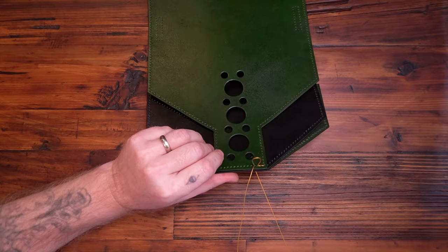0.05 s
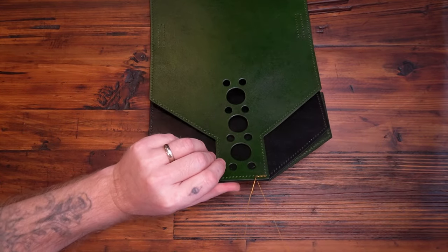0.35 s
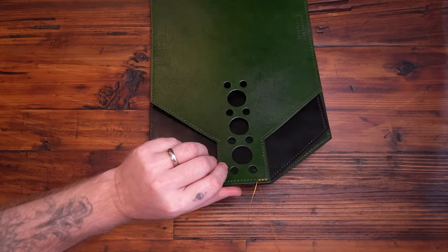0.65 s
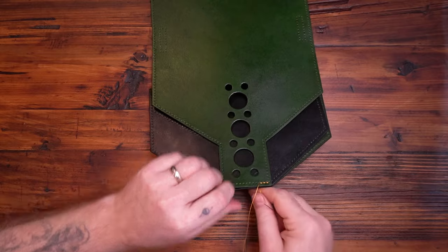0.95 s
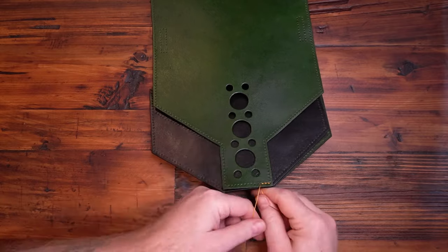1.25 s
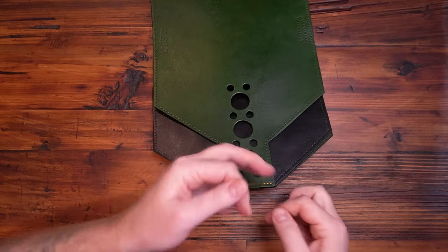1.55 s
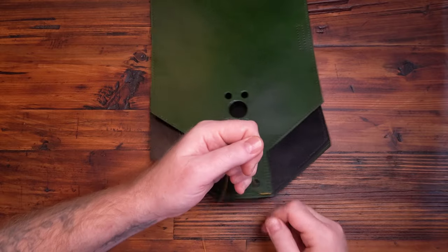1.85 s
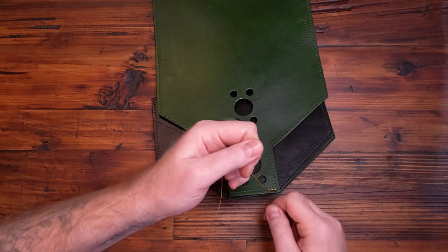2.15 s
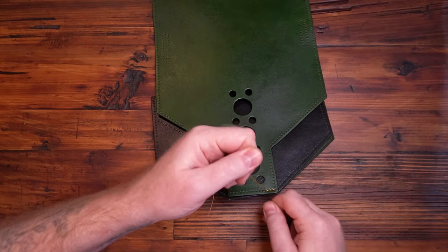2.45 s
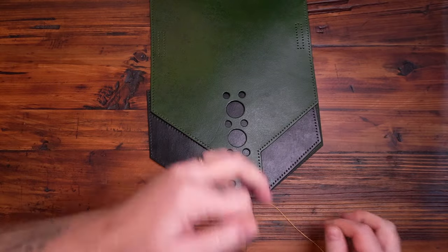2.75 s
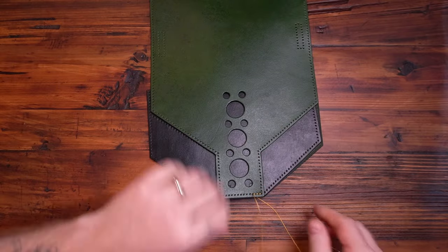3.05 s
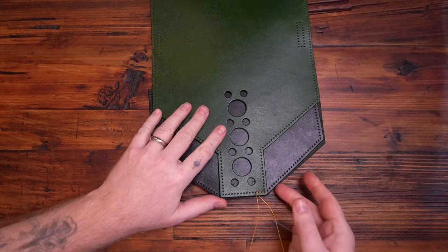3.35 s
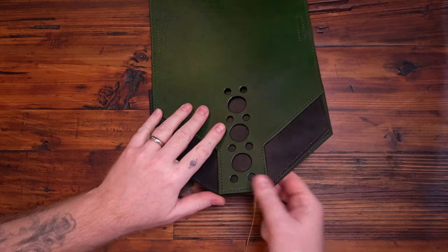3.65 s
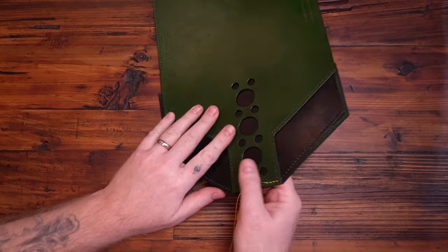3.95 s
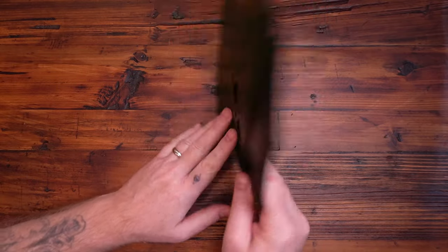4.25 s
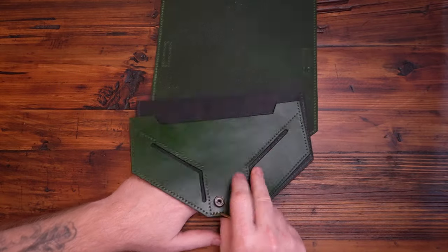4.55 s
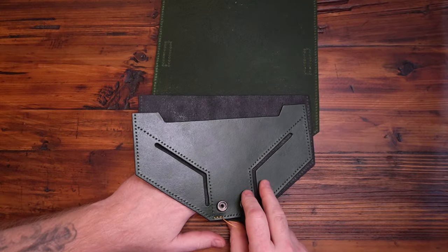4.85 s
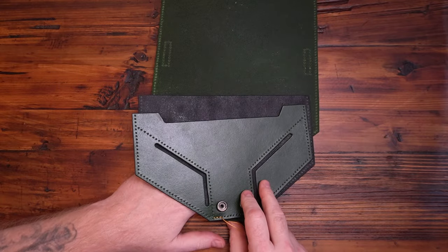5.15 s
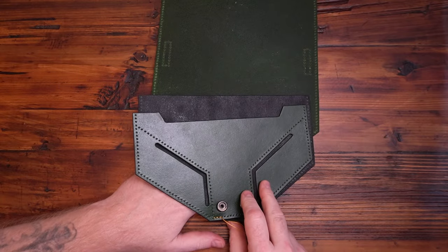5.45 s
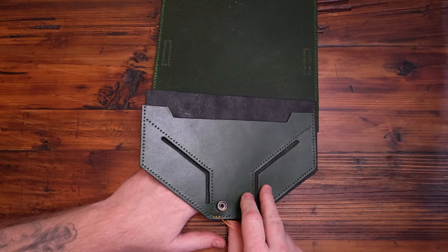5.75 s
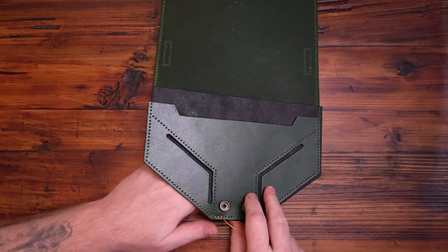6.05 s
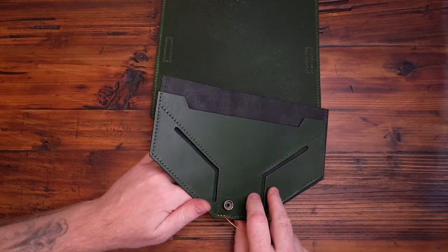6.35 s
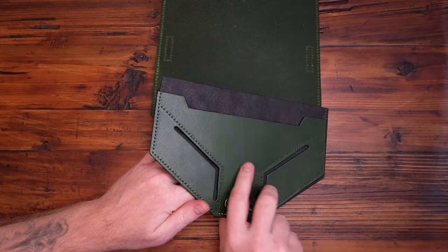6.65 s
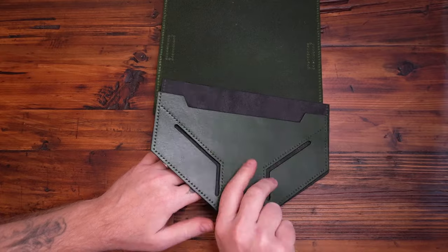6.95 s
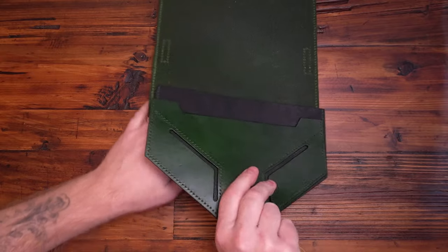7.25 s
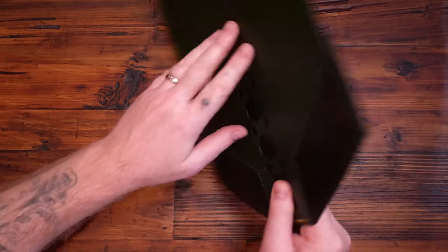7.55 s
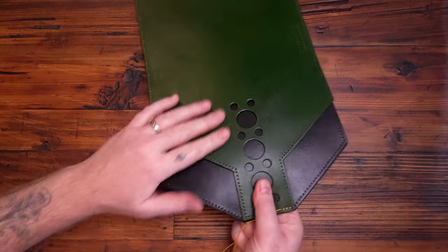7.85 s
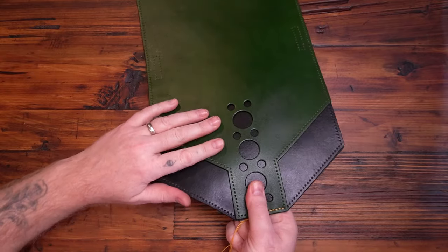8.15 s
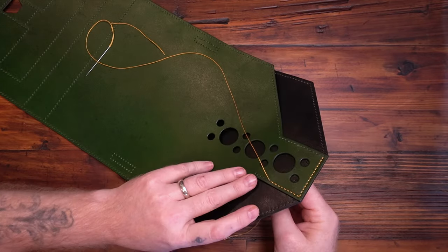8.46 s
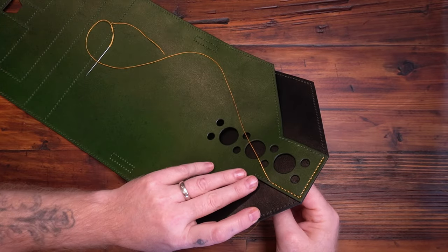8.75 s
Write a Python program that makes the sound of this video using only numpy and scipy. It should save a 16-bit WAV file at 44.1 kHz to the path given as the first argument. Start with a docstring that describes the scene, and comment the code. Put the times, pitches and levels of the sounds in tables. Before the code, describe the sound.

Short scratchy thread pulls and light ticks, followed by leather scraping, turning over and landing twice with soft thumps on wood.

```python
"""Leather panel on a wooden table

Close up in a small quiet room, waxed thread rasps and snaps as a stitch is drawn tight; then the stiff
panel is dragged, turned over twice and dropped flat. Each contact is a short crush of tiny impacts that
also knocks the table. Each stroke is a stream of fine grains that swells and dies away with the hand,
coloured by the panel and the air pocket under it."""
import sys
import numpy as np
from scipy import signal
from scipy.fft import rfft, irfft, next_fast_len
from scipy.io import wavfile
from scipy.ndimage import uniform_filter1d

SR = 44100
rng = np.random.default_rng(int(sys.argv[2]) if len(sys.argv) > 2 else 0)


def file_out(sig):
    """Save sig as 16-bit WAV at sys.argv[1]."""
    # one column per channel
    cols = np.atleast_2d(sig).T
    # limit, then scale
    lim = np.clip(cols, -1, 1)
    pcm = np.round(lim * 32767).astype(np.int16)
    wavfile.write(sys.argv[1], SR, pcm)


N = 388080

# taps, thread snaps and slaps of the panel: (time [s], relative energy [dB], tone [Hz],
# slope above the tone [dB/octave], relative table thump energy [dB], length before stretching [ms])
CONTACTS = [(0.2544, -25.5, 1250, -10, -31, 2.9), (0.3317, -9, 950, -4, -40, 0.82),
            (0.4564, -22.5, 900, -8, -38, 0.82), (1.437, -18.5, 960, -12, -36, 7.6),
            (1.456, -23, 1440, -0.5, -38, 2), (1.746, -19, 1540, -5, -41, 1.3),
            (1.755, -16, 1500, -3, -32, 4.5), (1.779, -18, 2020, -6, -32, 1.8),
            (2.663, -27.5, 1800, -12, -39, 1.8), (2.6958, -4.5, 2360, -15, -18.5, 1.6),
            (2.698, -1.5, 2440, -7, -16, 3), (3.344, -30, 1120, -7.5, -49, 2.7),
            (3.74, -23, 1110, -7, -45, 2.4), (3.759, -25, 980, -9.5, -41, 0.98),
            (4.248, -10, 1000, -7, -30, 1.3), (4.475, -24.5, 450, -8, -34, 3.3),
            (4.584, -10.5, 450, -6.5, -21, 6.8), (4.593, -4.5, 910, -7, -28, 2.9),
            (4.612, 3.5, 1020, -6.8, -8.5, 3), (4.6255, 6, 580, -4, -3.5, 3.7),
            (4.6363, 1.5, 670, -4, -16, 1.8), (4.642, -2.5, 450, -1, -4.5, 2.6),
            (4.713, 0.5, 930, 0, -32, 2.9), (4.74, -5, 920, 0, -45, 0.91), (4.7502, -6, 470, 2, -11, 1.4),
            (4.7558, -4.5, 740, -5.5, -18.5, 7.5), (4.887, -1.5, 2900, 1, -23, 0.76),
            (4.968, -20, 1470, -1.5, -43, 6.4), (4.986, -27.5, 600, -4, -45, 1.7),
            (5.079, -31, 890, -0.5, -39, 0.68), (5.162, -33, 900, 1, -52, 1),
            (6.84, -24.5, 2370, -0.5, -41, 1.7), (7.024, -26.5, 950, -12, -39, 2.7),
            (7.076, -12.5, 870, -12.5, -28, 4.1), (7.2903, -16, 1000, -8.5, -29, 1.6),
            (7.388, -15, 450, -3, -20, 0.86), (7.456, -15.5, 720, -4.5, -20, 1.8),
            (7.487, -13, 1190, -1.5, -36, 1.4), (7.5, -13, 1820, -4, -46, 2),
            (7.514, -9, 600, -0.5, -21, 3), (7.667, -23, 520, -13, -43, 3.3),
            (7.894, 6, 460, -4, -29, 1.36), (7.8996, 3.5, 650, -6, 1.5, 2.1),
            (7.9174, 0, 450, -5.5, -18, 1.5), (7.982, -11, 450, -4.5, -41, 0.96),
            (8.096, -21, 1090, -6, -29, 2.2)]
# dull spectrum of the table when knocked or pushed: (frequency [Hz], relative level [dB])
TABLE_RUMBLE = [(25, -20), (60, -15), (125, -7), (175, -23), (210, -2.5), (260, -9), (330, -2), (410, -13),
                (700, -13), (1500, -53)]


def undb(db):
    """Decibels to gain."""
    return 10 ** (np.asarray(db) / 20)


def unit(x):
    """Scale to an energy of one."""
    return x / np.sqrt(np.sum(x ** 2))


def level(x, db):
    """Scale to an rms level."""
    return x * undb(db) / np.sqrt(np.mean(x ** 2))


def at_hz(hz, points):
    """Read (frequency, value) points on a log-frequency axis."""
    f, value = np.transpose(points)
    return np.interp(np.log(hz + 1), np.log(f), value)


def colour(x, points):
    """Equalise by (frequency [Hz], gain [dB]) points and scale to an rms of one."""
    gain = undb(at_hz(np.fft.rfftfreq(len(x), 1 / SR), points))
    return level(np.fft.irfft(rfft(x) * gain, len(x)), 0)


def resonate(x, hz, q):
    """A resonance with a gain of one at its centre."""
    return signal.lfilter(*signal.iirpeak(hz, q, fs=SR), x + 1e-18)


def walk(per_s):
    """A random drift with a spread near one."""
    knots = rng.standard_normal(N // 40)
    return 1.2 * np.interp(np.arange(N) / SR * per_s, np.arange(len(knots)), knots)


def add(track, s, sound):
    """Mix a sound in at a time."""
    i = int(s * SR)
    track[i:i + len(sound)] += sound[:N - i]


def swell(peak_s, rise_s, fall_s, depth_db=19, roundness=0.92):
    """Envelope of one hand movement: it gains depth_db over its rise and loses it over its fall."""
    near = np.arange(max(0, int((peak_s - 3 * rise_s) * SR)), min(N, int((peak_s + 3 * fall_s) * SR)))
    t, gain = near / SR - peak_s, np.zeros(N)
    gain[near] = undb(-depth_db * np.maximum(-t / rise_s, t / fall_s) ** roundness)
    return gain


def room_tone(air_db=-63.5, waver_db=1.5, side_db=-68):
    """Still air and a faint fan; the bass is alike in both ears, the hiss less so."""
    # spectrum of the quiet air: (frequency [Hz], relative level [dB])
    air_spectrum = [(12, -40), (20, -7), (127, -6.5), (163, -9.5), (204, -4), (241, -10), (399, -14.5),
                    (459, -14), (660, -13.5), (1030, -20), (1440, -20.5), (2140, -25.5), (2320, -25),
                    (14700, -33.5), (16000, -36)]
    # broad drones of a distant fan: (frequency [Hz], half width [Hz], level [dB])
    fan_drones = [(215, 14, -74), (652, 36, -74)]
    side_spectrum = [(30, -19.5), (200, -9.5), (700, -10), (2000, -18), (6000, -24.5), (16000, -34)]
    mid = colour(rng.standard_normal(N), air_spectrum) * undb(air_db - waver_db * walk(3.06))
    side = colour(rng.standard_normal(N), side_spectrum)
    f = np.fft.rfftfreq(N, 1 / SR)
    for hz, width_hz, db in fan_drones:
        drone = irfft(rfft(rng.standard_normal(N)) / (1 + ((f - hz) / width_hz) ** 2))
        mid += level(drone, db)
    return mid + undb(side_db) * side * np.array([[1], [-1]])


def reflections(x, eq, decay_scale, delay_s, size=26000):
    """A diffuse echo of x whose octave bands die at their own pace; eq is (frequency [Hz], gain [dB])."""
    # decay of the room: (frequency [Hz], t60 before decay_scale [s])
    room_decay = [(100, 0.83), (350, 0.39), (1000, 0.44), (2500, 0.34), (6000, 0.33), (14000, 0.18)]
    t, f = np.arange(size) / SR, np.fft.rfftfreq(size, 1 / SR)
    noise, tail = rfft(rng.standard_normal(size)), 0
    for hz in 62.5 * 2 ** np.arange(9):
        band = irfft(noise * np.maximum(1 - np.abs(np.log2((f + 1) / hz)), 0))
        t60 = decay_scale * at_hz(hz, room_decay)
        tail = tail + band * np.exp(-np.log(1000) * t / t60)
    echo = unit(tail * np.clip(t / delay_s - .5, 0, 1))
    padded = next_fast_len(N + size)
    gain = undb(at_hz(np.fft.rfftfreq(padded, 1 / SR), eq))
    return irfft(rfft(x, padded) * rfft(echo, padded) * gain, padded)[:N]


def pushing(trim_db=-2):
    """Dragging weight makes the table rumble."""
    # hands and flexing panel bearing down: (hardest at [s], rise [s], fall [s], relative level [dB])
    pushes = [(3.26, 0.037, 0.62, -60), (3.78, .3, .3, -73), (4.29, 0.21, 0.27, -51.5),
              (4.63, .04, .17, -47), (4.85, 0.193, .2, -56), (7.5, .3, 0.29, -61), (7.65, 0.12, 0.12, -53),
              (7.91, 0.054, 0.2, -44)]
    power = sum((undb(db + trim_db) * swell(*timing)) ** 2 for *timing, db in pushes)
    return np.sqrt(power) * colour(rng.standard_normal(N), TABLE_RUMBLE)


def judders(q=14, size=16384):
    """Skin sticks and slips on the wood in short, narrow, low groans."""
    # a palm juddering over the table: (centre time [s], half length [s], pitch [Hz], level [dB])
    groans = [(2.972, 0.11, 210, -65.5), (3.281, 0.058, 489, -61), (3.541, 0.045, 198, -62.5),
              (3.635, 0.052, 197, -58.5), (3.768, .025, 65, -62), (7.665, 0.026, 71.4, -59.5)]
    out, t = np.zeros(N), (np.arange(size) - size / 2) / SR
    for s, half_s, hz, db in groans:
        groan = resonate(rng.standard_normal(size), hz, q)
        add(out, s + t[0], level(groan, db) * np.exp(-(t / half_s) ** 2))
    return out


def whumps(hz=122, q=1.6, decay_s=0.047, rise_s=.006, size=16384):
    """The falling panel squeezes out the air beneath it in a soft low whump."""
    # the panel falling flat: (time [s], level before the envelope [dB])
    landings = [(4.625, -43), (7.9, -39)]
    out, t = np.zeros(N), np.arange(size) / SR
    for s, db in landings:
        air = resonate(resonate(rng.standard_normal(size), hz, q), hz, q)
        add(out, s, level(air, db) * (1 - np.exp(-t / rise_s)) * np.exp(-t / decay_s))
    return out


def thump(knock_db=-3, rise_s=0.00274, decay_s=0.0093, ring_db=1, uneven_db=2, size=12000):
    """The table answers with a dull knock and its low modes, in a new mix at each spot."""
    # modes of the table top: (frequency [Hz], relative level [dB], t60 [s])
    table_modes = [(100.4, -3.5, 0.2), (130.6, 0, 0.37), (153.2, -6, 0.56), (244, -18, 0.54),
                   (324, 5.5, 0.24), (435.3, -2, 0.21), (529, -1, 0.26), (683.6, -6.5, 0.18),
                   (767, -4.5, 0.33)]
    t = np.arange(size) / SR
    hz, db, t60 = np.transpose(table_modes)[:, :, None]
    share, detune, polarity = rng.standard_normal((3, len(table_modes), 1), dtype=np.float32)
    modes = np.sin(2 * np.pi * hz * (1 + 0.0053 * detune) * t) * np.exp(-np.log(1000) * t / t60)
    ring = np.sum(np.sign(polarity) * undb(db + uneven_db * share) * modes, axis=0)
    envelope = (1 - np.exp(-t / rise_s)) * np.exp(-t / decay_s)
    knock = colour(rng.standard_normal(size), TABLE_RUMBLE) * envelope
    return undb(knock_db) * unit(knock) + undb(ring_db) * unit(ring)


def knocks(trim_db=-1):
    """Each contact also shakes the table."""
    out = np.zeros(N)
    for s, _, _, _, thump_db, _ in CONTACTS:
        add(out, s, undb(thump_db + trim_db) * thump())
    return out


def air_pocket(x, q=6.1, through_db=-0.58, count=9):
    """Air trapped under the panel adds a hollow note that glides as the panel bends."""
    # note of the pocket: (time [s], pitch [Hz])
    pocket_glide = [(.3, 1090), (3.75, 1000), (3.9, 850), (4.1, 790), (4.2, 610), (4.4, 680), (4.63, 770),
                    (4.8, 880), (5.0, 780), (6.2, 1020), (7.29, 856), (7.42, 760), (7.65, 600), (7.9, 740),
                    (8.25, 860)]
    hz = np.interp(np.arange(N) / SR, *np.transpose(pocket_glide))
    centres = np.geomspace(hz.min(), hz.max(), count)
    out = undb(through_db) * x
    for centre, share in zip(centres, np.eye(count)):
        crossfade = np.interp(hz, centres, share)
        out += crossfade * resonate(x, centre, q)
    return out


def panel(x, through_db=-1):
    """The stiff panel lends its resonances to whatever rubs or strikes it."""
    # resonances of the panel and the taut thread in it: (frequency [Hz], Q, gain [dB])
    resonances = [(669, 22, -12), (978, 16, -10.5), (1710, 61, -17), (1983, 29, -6.5), (2260, 9.8, -8),
                  (2860, 23, -16.5), (5600, 12, -10), (6600, 35, -12.5), (13400, 16, -18)]
    return undb(through_db) * x + sum(undb(db) * resonate(x, hz, q) for hz, q, db in resonances)


def crush(tone_hz, slope, ms, q=1, rise=0.13, size=2048):
    """One contact: a brief burst of micro-impacts rings a heavily damped patch of leather."""
    age = np.arange(size) / SR * 1000 / max(ms, .3)  # in burst lengths
    burst = rfft(rng.standard_normal(size) * (1 - np.exp(-age / rise)) * np.exp(-age ** 1.05))
    burst /= np.sqrt(uniform_filter1d(np.abs(burst) ** 2, size=36))  # flatten, so the patch sets the tone
    s = 1j * np.fft.rfftfreq(size, 1 / SR) / tone_hz
    # a small patch radiates no bass; a soft contact loses treble
    patch = s * s / (s * s + s / q + 1) * (1 + s) ** (slope / 6)
    return unit(irfft(burst * patch)[:size // 2])


def crackle(tone_hz=4800, slope=-4, scatter_db=3, ms=1, count=24):
    """Bent leather lets go in small dry clicks at uneven gaps."""
    # runs of clicks: (start [s], end [s], rate [1/s], energy at start [dB], energy at end [dB])
    flexes = [(4.412, 4.441, 89, -28, -28), (4.614, 4.831, 75, -13.5, -15), (4.835, 4.93, 123, -19.5, -32),
              (7.439, 7.633, 66, -22.5, -32.5)]
    out = np.zeros(N)
    for start, end, per_s, first_db, last_db in flexes:
        places = (np.arange(count) + rng.random(count)) / (per_s * (end - start))
        for place, (force, pitch) in zip(places, rng.standard_normal((count, 2))):
            click = crush(tone_hz * 1.3 ** pitch, slope, ms)
            if place < 1:
                db = first_db + place * (last_db - first_db) + scatter_db * force
                add(out, start + place * (end - start), undb(db) * click)
    return out


def twang(at_s=2.698, size=4096):
    """The waxed thread rings for an instant as the stitch snaps tight."""
    # partials of the taut thread: (frequency [Hz], energy [dB], t60 [s])
    thread_partials = [(2600, -11, 0.019), (2850, -10.5, 0.027), (4150, -17, 0.036), (6650, -13, .008)]
    out, t = np.zeros(N), np.arange(size) / SR
    for hz, db, t60 in thread_partials:
        partial = np.sin(2 * np.pi * hz * t) * np.exp(-np.log(1000) * t / t60)
        add(out, at_s, undb(db) * unit(partial))
    return out


def wandering(x, low_hz=1400, high_hz=14000, q=16, ring_db=-4, wander_db=5, per_s=14, count=18):
    """As the point of contact moves, overlapping resonances come and go in the scrape."""
    centres = np.geomspace(low_hz, high_hz, count)
    return x + sum(undb(ring_db + wander_db * walk(per_s)) * resonate(x, hz, q) for hz in centres)


def sliding(grains_per_s=6000, spread_db=2, smooth_db=-1, catch_db=2, rasp_db=-1, sheet_db=-4, hiss_db=-2):
    """Fibres catch and let go in uneven grains, heard as edge rasp, hollow sheet and fine hiss."""
    # strokes of thread and leather: (fastest at [s], rise [s], fall [s], relative level [dB],
    # sheet offset [dB], hiss offset [dB])
    strokes = [(0.326, 0.065, 0.08, -46, 5, -9.5), (0.465, 0.052, 0.11, -63, 5, -3.5),
               (1.07, 0.56, 0.37, -62.5, -17, -4.5), (1.44, 0.082, .09, -55.5, -8, -6.5),
               (1.76, 0.024, 0.082, -45.5, -2.5, -7), (1.94, 0.31, .11, -51, -2.5, -9),
               (2.09, 0.29, 0.16, -60, -2.5, -14), (2.63, .05, 0.083, -57, -17, -3),
               (2.695, 0.037, 0.098, -50.5, -1, 0), (3.31, 0.11, 0.13, -60.5, -3, -2),
               (3.48, 0.097, 0.13, -62, 0.5, -2), (3.72, 0.1, 0.21, -58.5, -0.5, 5),
               (3.92, 0.16, 0.32, -59.5, 4.5, 0.5), (4.25, 0.17, 0.14, -41, -2, -8),
               (4.302, 0.13, 0.019, -40.5, -11, 3.5), (4.355, 0.023, 0.095, -50, 4, -4),
               (4.54, 0.085, .08, -59.5, -1, 2.5), (4.628, 0.029, 0.098, -29.5, -2.5, -14),
               (4.765, 0.058, 0.07, -33.5, -22, -6), (4.905, 0.21, 0.03, -51.5, 0, -12),
               (4.99, .03, 0.014, -58, 7.5, 1), (5.87, 0.26, 0.17, -66.5, 0, -13),
               (6.2, 0.22, 0.2, -61.5, -2.5, -7), (6.76, 0.31, 0.14, -61.5, -4, -1),
               (7.04, 0.3, 0.22, -62, 2, -6), (7.25, 0.21, 0.25, -63, 5.5, 4.5),
               (7.31, 0.066, 0.28, -54, 8, -9), (7.405, 0.098, 0.037, -47.5, 8.5, -5.5),
               (7.522, 0.15, 0.045, -41.5, -5.5, -2.5), (7.63, 0.045, 0.11, -59.5, 1, -2),
               (7.819, 0.4, 0.42, -67, 8, 12.5), (7.91, 0.011, 0.057, -28.5, 2.5, -17),
               (7.974, .06, 0.085, -37, 0.5, -14), (8.123, 0.059, 0.018, -50.5, 8, -8),
               (8.248, 0.1, 0.094, -56, 8, -10)]
    # spectra of the rasping edge, hollow sheet and fine grain: (frequency [Hz], relative level [dB])
    rasp_spectrum = [(600, -31), (1100, 1), (1500, 0.5), (2200, 3), (3000, 0.5), (4200, -3.5), (6200, -13),
                     (8000, -18.5), (14000, -34)]
    sheet_spectrum = [(200, -42), (400, -2.5), (600, 3.5), (800, 3.5), (1020, -1.5), (1300, -5),
                      (2000, -19), (4000, -43)]
    hiss_spectrum = [(3000, -13), (6000, -3), (7800, -0.5), (10000, 0), (13500, -2.5), (16000, -6.5)]
    power = np.zeros((3, N))
    for *timing, db, hollow_db, fine_db in strokes:
        power += np.outer(undb([db, db + hollow_db, db + fine_db]), swell(*timing)) ** 2
    rasp_swell, sheet_swell, hiss_swell = np.sqrt(power)
    sizes = undb(spread_db * np.minimum(rng.exponential(size=N), 5))
    grains = (rng.random(N) < grains_per_s / SR) * sizes * rng.choice([-1, 1], N)
    texture = level(grains, 0) + undb(smooth_db) * rng.standard_normal(N)
    friction = wandering(texture * undb(catch_db * walk(110)))
    rasp = undb(rasp_db) * rasp_swell * colour(friction, rasp_spectrum)
    sheet = undb(sheet_db) * sheet_swell * colour(friction[::-1], sheet_spectrum)  # reversed: own grain
    hiss = undb(hiss_db) * hiss_swell * colour(friction, hiss_spectrum)
    return rasp + sheet + hiss


def contacts(stretch, trim_db=-1.22):
    """All taps, thread snaps and slaps of the panel; stretch scales their length."""
    out = np.zeros(N)
    for s, db, tone_hz, slope, _, ms in CONTACTS:
        add(out, s, undb(db + trim_db) * crush(tone_hz, slope, ms * stretch))
    return out


def scene():
    """Direct sound in the middle, the walls around it, and treble that scatters to the sides."""
    # colour of each echo: (frequency [Hz], gain [dB])
    walls_eq = [(100, -11.5), (600, -10.5), (2500, -11.5), (7000, -11.5), (15000, -6.5)]
    side_eq = [(100, -42.5), (500, -23.5), (1200, -16), (3000, -16), (15000, -12)]
    bounce_eq = [(100, -36), (500, -24.5), (1000, -28), (3000, -10), (8000, -8), (15000, -2)]
    handling = sliding() + crackle() + twang()
    low_end = knocks() + pushing() + judders() + whumps()
    direct = air_pocket(panel(contacts(stretch=1) + handling)) + low_end
    # summed over all directions a contact has the smooth spectrum of one click
    radiated = air_pocket(panel(contacts(stretch=.1) + handling)) + low_end
    walls = reflections(radiated, walls_eq, decay_scale=0.82, delay_s=0.0045)
    walls_side = reflections(radiated, side_eq, decay_scale=1, delay_s=0.0038)
    # sideways each contact radiates other micro-impacts, which bounce off the table
    sideways = contacts(stretch=0.56) + handling
    bounces = reflections(sideways, bounce_eq, decay_scale=0.031, delay_s=0.00027, size=2048)
    return direct + walls + (walls_side + bounces) * np.array([[1], [-1]]) + room_tone()


def record(dry, low_hz=24, top_hz=16100):
    """The microphone sheds the deepest bass, leans slightly right and cuts the top steeply."""
    lean = signal.sosfilt(signal.butter(2, low_hz, "highpass", fs=SR, output="sos"), dry)
    balance = undb([[-.2], [.2]])
    return signal.sosfiltfilt(signal.ellip(8, .1, 60, top_hz, fs=SR, output="sos"), lean * balance)


dry = scene()
out = record(dry)
file_out(out)
```